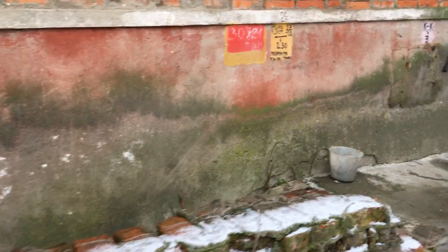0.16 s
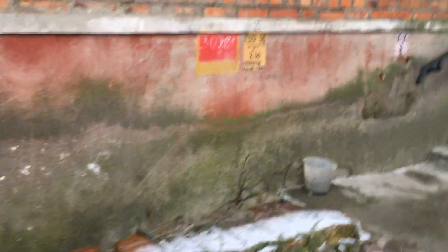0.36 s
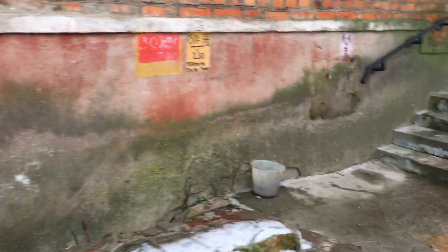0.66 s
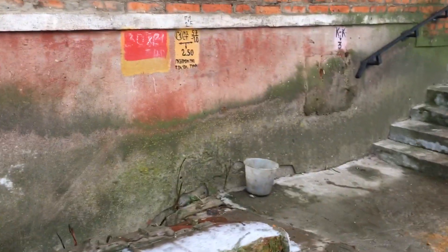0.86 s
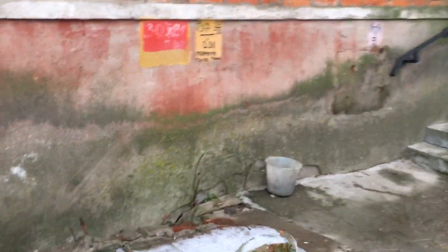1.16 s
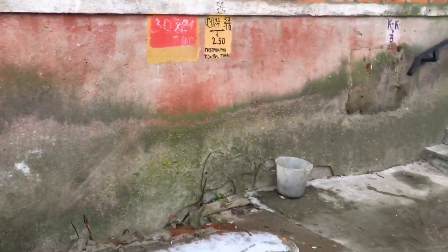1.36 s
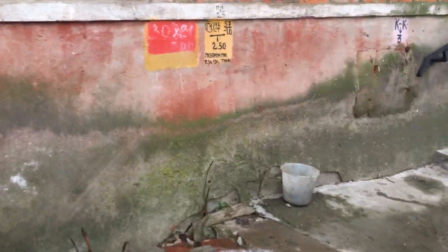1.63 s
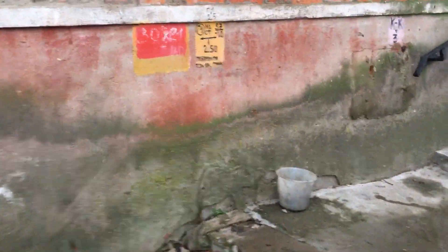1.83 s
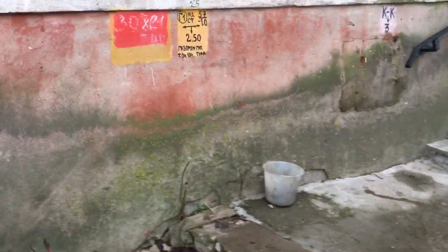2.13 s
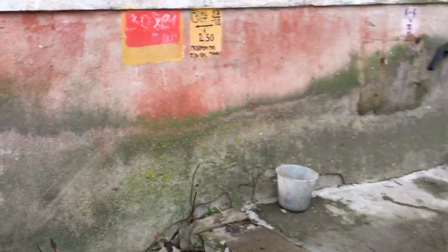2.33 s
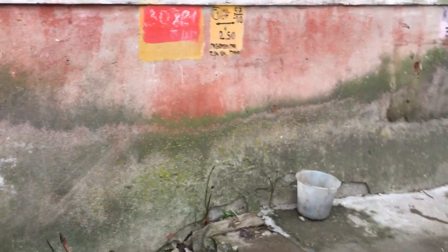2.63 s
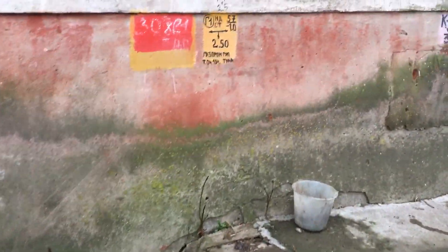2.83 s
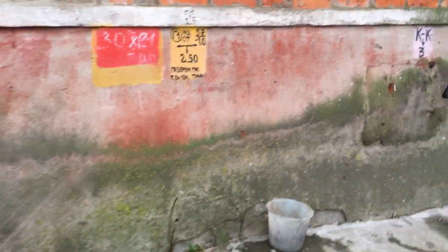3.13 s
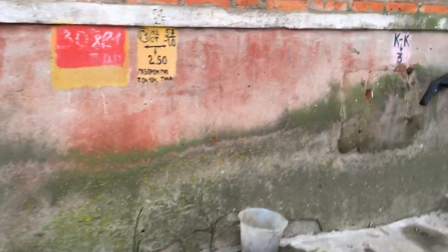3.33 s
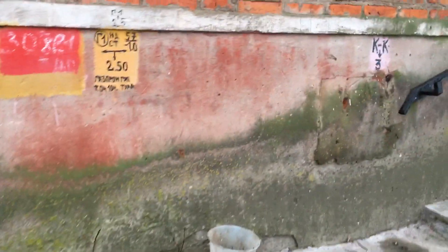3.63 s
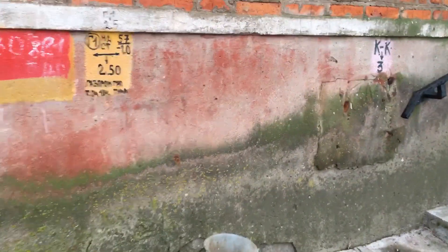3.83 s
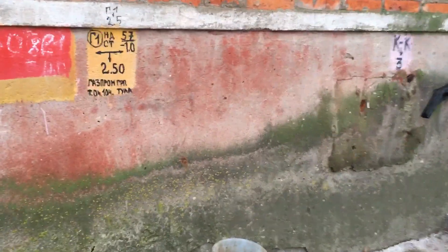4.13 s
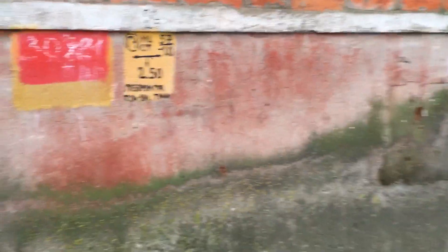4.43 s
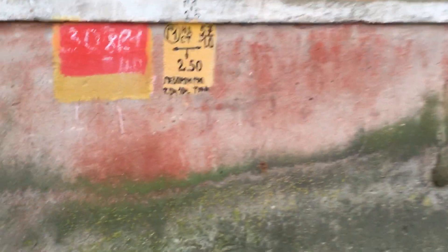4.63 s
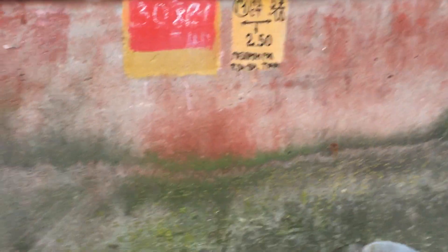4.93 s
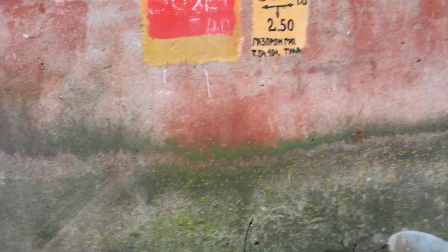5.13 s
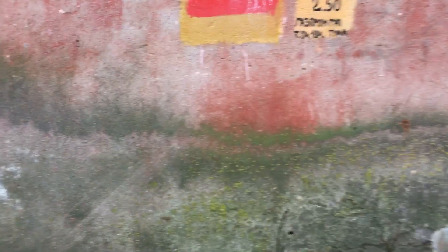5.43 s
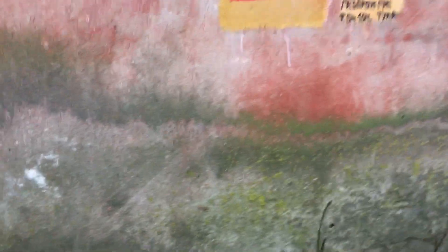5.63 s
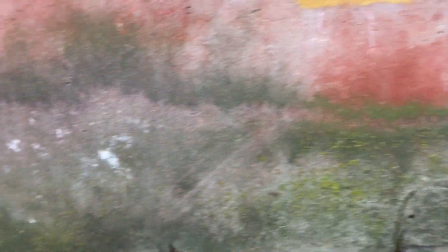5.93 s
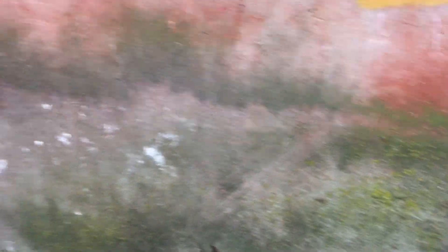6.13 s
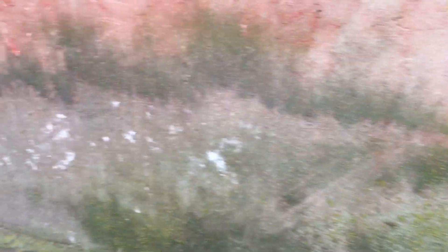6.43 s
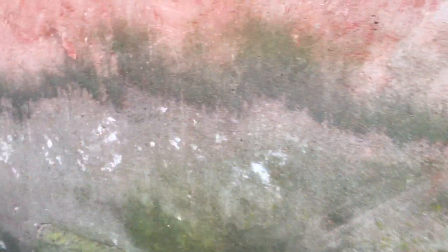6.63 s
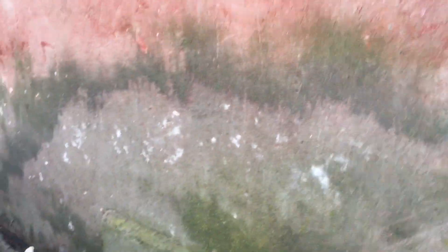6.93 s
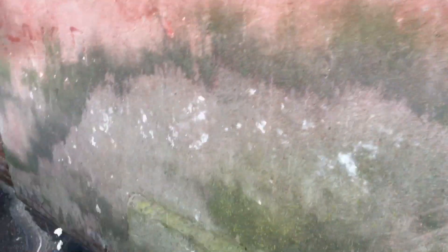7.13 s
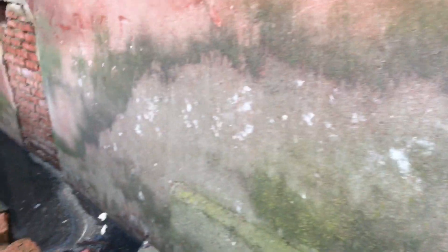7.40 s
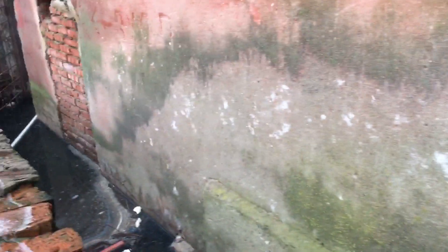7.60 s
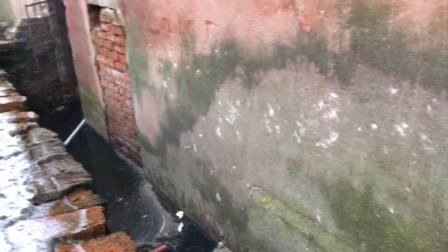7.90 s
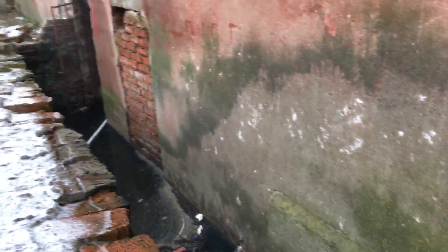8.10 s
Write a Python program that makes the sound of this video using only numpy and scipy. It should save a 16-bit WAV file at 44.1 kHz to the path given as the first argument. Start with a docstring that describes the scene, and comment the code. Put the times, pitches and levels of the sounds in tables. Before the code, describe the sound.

Boots crunch and snap crusted snow in a walled yard, two spells of steps with lulls between, over a faint low hum.

```python
"""Boots shift and step on crusted snow in a walled yard, below a hand-held camera.
The crust cracks in short pitched snaps with a splinter of hiss, or pops dully; grains crush in clumps
of clicks, packed snow thuds in a few low cycles, and ticks and soft brushes are shaped noise.
The walls throw the foot sounds back over noise, a low town hum and gusts of rumble."""
import sys
import numpy as np
from scipy import signal
from scipy.io import wavfile

SR = 44100
rng = np.random.default_rng(int(sys.argv[2]) if len(sys.argv) > 2 else 0)


def digitize_waveform(pressure):
    """Quantize a signal to 16-bit integers and store it at the path in sys.argv[1].

    Rows of a 2-D input are taken as channels; values are limited to [-1, 1].
    """
    field = np.atleast_2d(pressure).T
    bounded = np.clip(field, -1, 1)
    quanta = np.round(bounded * 32767).astype(np.int16)
    wavfile.write(sys.argv[1], SR, quanta)


def voltage_ratio(decibels):
    """Convert decibels (scalar or array-like) to amplitude ratios, 20 dB per decade."""
    exponent = np.asarray(decibels, float) / 20
    return 10 ** exponent


N = 364266

# Spectrum of breaking snow grains. Each row: frequency in Hz, relative density in dB per Hz.
GRAIN_SPECTRUM = [(600, -10.5), (1800, 4.5), (2800, -1.5), (4500, -4.5), (8000, -8.5), (13000, -6.5),
                  (15800, -12.5), (16500, -64)]


def evened(x):
    """Scales x to unit rms."""
    return x / np.sqrt(np.mean(x ** 2) + 1e-20)


def coloured(x, points):
    """Shapes x to a spectrum with causal (minimum) phase, at unit rms."""
    hz, db = np.transpose(points)
    bin_hz = abs(np.fft.fftfreq(4096, 1 / SR))
    log_gain = np.log(voltage_ratio(np.interp(np.log(bin_hz + 1), np.log(hz + 1), db)))
    taps = np.fft.ifft(np.exp(np.conj(signal.hilbert(log_gain)))).real[:2048]
    return evened(signal.oaconvolve(x, taps)[:N])


def resonate(x, hz, width_hz):
    """Resonance at unit rms: shifts hz down to zero, smooths twice, shifts back."""
    carrier = np.exp(2j * np.pi * hz * np.arange(len(x)) / SR)
    pole = np.exp(-np.pi * width_hz / SR)
    smooth = signal.lfilter([1 - pole], [1, -pole], x / carrier)
    smooth = signal.lfilter([1 - pole], [1, -pole], smooth)
    return evened((carrier * smooth).real)


def clicks(per_s, spread_db):
    """Sparse clicks of either sign; a few are large."""
    size_db = spread_db * np.minimum(rng.exponential(1, N), 3.5)
    size = voltage_ratio(size_db) * rng.choice([-1., 1.], N)
    return size * (rng.random(N) < per_s / SR)


def wavelet(t, hz, cycles):
    """A short oscillation that swells quickly and dies, envelope peak 1."""
    u = np.maximum(t, 0) * hz / cycles
    return (np.e * u / 2) ** 2 * np.exp(-u) * np.sin(2 * np.pi * hz * t)


def swells(rows):
    """Sum of bell-shaped swells from rows of time, half length and dB."""
    t = np.arange(N) / SR
    return sum(voltage_ratio(db) * np.exp(-((t - s) / half_s) ** 2) for s, half_s, db in rows)


def yard():
    """Smooth far noise, fuzzy drones and a swelling rumble, all ebbing slowly apart from the gusts."""
    # Far noise. Each row: frequency in Hz, relative density in dB per Hz.
    air_spectrum = [(20, -21.5), (58, -8), (101, -15.5), (134, -10.5), (222, -17.5), (540, -26.5),
                    (1500, -34.5), (4000, -41.5), (9000, -46), (15500, -50), (16400, -66)]
    # Far drones. Each row: frequency in Hz, pole width in Hz, rms level at mid-scene in dB.
    hum = [(61.4, 7.7, -65), (153, 12.4, -67), (257, 58, -70)]
    # Rumble swells. Each row: centre in seconds, half length in seconds, rms level in dB.
    gusts = [(1.27, 0.14, -63), (5.67, 0.04, -44), (5.99, 0.071, -46.5)]
    air_db, air_fade_db_per_s, hum_fade_db_per_s = -59.5, -0.39, -0.7  # air_db at mid-scene
    rumble_start_db, rumble_fade_db_per_s = -58.5, -0.97
    t = np.arange(N) / SR
    from_middle_s = t - t.mean()
    air = coloured(rng.standard_normal(N), air_spectrum)
    air = air * voltage_ratio(air_db + air_fade_db_per_s * from_middle_s)
    drones = sum(voltage_ratio(db) * resonate(rng.standard_normal(N), hz, width_hz) for hz, width_hz, db in hum)
    drones = drones * voltage_ratio(hum_fade_db_per_s * from_middle_s)
    rumble_level = voltage_ratio(rumble_start_db + rumble_fade_db_per_s * t) + swells(gusts)
    rumble = rumble_level * resonate(rng.standard_normal(N), 62.3, 42)
    return air + drones + rumble


def walls(x, tail_db=-16, t60_s=0.19, smear_s=0.0012):
    """A few echoes from near rough brick, each smeared, and a short diffuse tail, all dulled."""
    # Wall echoes. Each row: delay in seconds, level in dB.
    echoes = [(.0056, -13.5), (0.013, -18), (0.0222, -19), (.03, -19)]
    t = np.arange(SR // 4) / SR
    tail = rng.standard_normal(len(t)) * (t > .004) * voltage_ratio(-60 * t / t60_s)
    taps = voltage_ratio(tail_db) * tail / np.linalg.norm(tail)
    for s, db in echoes:
        echo = rng.standard_normal(len(t)) * np.exp(-((t - s) / smear_s) ** 2)
        taps += voltage_ratio(db) * echo / np.linalg.norm(echo)
    dull = signal.butter(1, 3000, fs=SR, output="sos")
    return signal.fftconvolve(signal.sosfilt(dull, x), taps)[:N]


def tipped(start_s=4.2, length_s=0.1):
    """How far (0-1) the camera has tipped down towards the feet, where it hears more treble."""
    return np.clip((np.arange(N) / SR - start_s) / length_s, 0, 1)


def brushes():
    """Something soft brushes past: dense even clicks, band-passed, swell and fade."""
    # Brushes. Each row: centre in seconds, half length in seconds, rms level in dB.
    brush_rows = [(0.026, 0.049, -63.5), (1.454, 0.062, -59)]
    band = signal.butter(2, [500, 3200], "band", fs=SR, output="sos")
    return swells(brush_rows) * evened(signal.sosfilt(band, clicks(9000, 0.66)))


def ticks(fade_s=0.001, low_hz=5000):
    """Ice needles tick: each a very short burst of high hiss."""
    # Ticks. Each row: start in seconds, relative level in dB.
    tick_rows = [(1.008, -53), (1.027, -48.5), (1.184, -60), (1.258, -42.5), (4.779, -29), (4.898, -43.5),
                 (5.027, -39), (5.135, -41), (5.223, -34.5), (5.448, -32), (5.468, -43), (5.561, -50),
                 (5.651, -43), (5.713, -34), (6.038, -34), (6.977, -38), (7.419, -33.5)]
    train = np.zeros(N)
    for s, db in tick_rows:
        train[round(s * SR)] = voltage_ratio(db)
    bursts = signal.oaconvolve(train, np.exp(-np.arange(512) / SR / fade_s))[:N]
    band = signal.butter(2, [low_hz, 15500], "band", fs=SR, output="sos")
    hiss = signal.sosfilt(band, rng.standard_normal(N))
    return 0.57 * bursts * evened(hiss)


def thuds():
    """Packed snow caves in: each thud is a low, heavily damped oscillation."""
    # Cave-ins. Each row: start in seconds, envelope peak in dB.
    thud_rows = [(0.286, -44.5), (4.161, -29), (4.172, -30), (4.185, -42), (4.197, -27.5), (4.351, -31.5),
                 (4.388, -40.5), (4.583, -34.5), (4.63, -30.5), (4.774, -35), (5.204, -35.5), (5.259, -34),
                 (5.28, -36.5), (5.407, -32), (6.281, -35.5), (6.404, -26.5), (6.543, -14), (6.574, -26),
                 (6.614, -25), (6.639, -27), (6.655, -24), (6.711, -25), (6.755, -22)]
    out = np.zeros(N)
    thud = wavelet(np.arange(2048) / SR, 289.4, 0.47)
    for s, db in thud_rows:
        out[round(s * SR):][:2048] += voltage_ratio(db) * thud
    return out


def load(rise_s=0.0014, settle_s=0.013, creep_db=-16, creep_s=0.17):
    """Levels of fine grains, lumps and packing: a crunch starts fast, holds, settles, creeps on faintly."""
    # Weight on the snow. Each row: start in seconds, hold in seconds, weight in dB, sole depth 0-1.
    crunches = [(0.208, 0.11, -65, 0.86), (0.81, 0.51, -67, 0.33), (1.616, 0.32, -72, 0.86),
                (2.092, 0.049, -62.5, 0.05), (2.229, 0.2, -63.5, 0.5), (2.538, 0.083, -55.5, 0),
                (2.637, 0.21, -69.5, 0.66), (3.189, 0.0038, -50, 0.93), (3.215, 0.018, -40.5, 0.72),
                (3.359, 0.08, -52, 0.72), (3.493, 0.056, -55, 0.5), (3.587, 0.18, -60.5, 0.28),
                (3.916, 0.079, -63.5, 0.36), (4.073, 0.067, -52.5, 0.4), (4.152, 0.068, -45, 0.68),
                (4.229, 0.041, -52, 0.75), (4.346, 0.043, -55.5, 0.74), (4.45, 0.27, -58.5, 0.57),
                (4.709, 0.094, -44.5, 0.69), (4.924, 0.023, -58.5, 0), (5.029, 0.074, -53, 0.87),
                (5.128, 0.051, -66, 0.8), (5.202, 0.031, -50.5, 0.82), (5.269, 0.022, -53.5, 0.84),
                (5.404, 0.12, -52, 0.74), (5.545, 0.067, -51.5, 0.63), (5.634, 0.11, -57.5, 0.7),
                (6.037, 0.039, -50, 0.62), (6.117, 0.07, -61.5, 0.1), (6.276, 0.18, -47.5, 0.59),
                (6.393, 0.051, -45, 0.84), (6.466, 0.11, -46.5, 0.82), (6.57, 0.22, -46.5, 0.97),
                (6.787, 0.024, -48.5, 0.78), (6.828, 0.15, -61, 0.64), (6.946, 0.23, -64.5, 0),
                (7.202, 0.27, -72, 0.6)]
    # Level re weight at depth 0. Columns: fine grains, lumps, packing, all in dB.
    shallow_db = [-0.5, -11, -20]
    # Level re weight at depth 1. Columns: fine grains, lumps, packing, all in dB.
    deep_db = [0, 7.5, 10]
    t = np.arange(N) / SR
    power = np.zeros((3, N))
    for s, hold_s, weight_db, depth in crunches:
        levels = voltage_ratio(weight_db + (1 - depth) * np.array(shallow_db) + depth * np.array(deep_db))
        rise = np.clip((t - s) / rise_s, 0, 1)
        past_s = np.maximum(t - s - hold_s, 0)
        fall = np.maximum(np.exp(-past_s / settle_s), voltage_ratio(creep_db) * np.exp(-past_s / creep_s))
        power += (levels[:, None] * rise * fall) ** 2
    return np.sqrt(power)


def pieces(clumps, sizes_hz, per_s):
    """Short pitched breaks, one sparse train for each size of piece."""
    t = np.arange(1024) / SR
    trains = (signal.oaconvolve(clumps * clicks(per_s, 3.84), wavelet(t, hz, 0.63))[:N] for hz in sizes_hz)
    return evened(sum(trains))


def crush(heavy_db=-54, light_dullness_when_tipped=0.047):
    """Snow breaks in clumps that fire fine grains, chips, lumps and dull slips of the hollow underfoot."""
    # Hollow under the sole. Each row: frequency in Hz, pole width in Hz, relative level in dB.
    packed = [(162.3, 81, 4), (289.3, 87, 2.5)]
    levels = load()
    heavy = np.clip(levels[0] / voltage_ratio(heavy_db), 0, 1)

    clump = np.exp(-np.arange(1500) / SR / 0.0028)
    bursts = evened(signal.oaconvolve(abs(clicks(80, 2.1)), clump)[:N])
    steady = 0.21 + 0.92 * heavy  # heavy load runs the clumps together
    clumps = (steady + np.minimum(bursts, 2.6)) / (1 + steady)

    grains = coloured(clumps * clicks(6000, 2.86), GRAIN_SPECTRUM)
    top = signal.sosfilt(signal.butter(1, 7000, "high", fs=SR, output="sos"), grains)
    dullness = (1 - (1 - light_dullness_when_tipped) * tipped()) * (1 - heavy)
    grains = grains - np.minimum(3.7 * dullness, 1) * top  # a light load is duller
    fine = grains + .6 * pieces(clumps, np.geomspace(2200, 7000, 8), 70)  # grains and chips

    lumps = pieces(clumps, np.geomspace(430, 2200, 12), 110)
    slips = (1 + 0.18 * clumps) * clicks(180, 3.2)
    hollow = sum(voltage_ratio(db) * resonate(slips, hz, width_hz) for hz, width_hz, db in packed)
    return (levels * [evened(fine), lumps, evened(hollow)]).sum(0)


def cracks(crumble_db=-12, crumble_s=0.005):
    """A crack is a slab snap, a splinter of hiss and three smaller late breaks; a pop breaks once."""
    # Cracks of the crust. Each row: start in seconds, snap envelope peak in dB, slab pitch in Hz.
    crack_rows = [(0.229, -39, 1220), (1.245, -55, 3550), (1.84, -50, 2000), (1.859, -40.5, 1790),
                  (2.095, -48.5, 3220), (2.326, -49, 3740), (2.366, -42.5, 2430), (2.672, -35, 2140),
                  (3.194, -27.5, 1130), (3.215, -26, 610), (3.263, -31.5, 760), (3.346, -36, 686),
                  (3.366, -34, 1100), (3.398, -22, 700), (3.421, -27.5, 1280), (3.482, -33, 1510),
                  (3.512, -23, 780), (3.541, -30.5, 1060), (3.628, -36, 1020), (3.678, -36.5, 1120),
                  (4.078, -34, 2330), (4.12, -32, 830), (4.186, -24, 2380), (4.2, -26, 920),
                  (4.233, -37, 990), (4.256, -33, 1540), (4.375, -38.5, 1380), (4.44, -41, 1620),
                  (4.467, -38, 910), (4.48, -33.5, 1240), (4.497, -30.5, 1780), (4.539, -33.5, 644),
                  (4.584, -28.5, 980), (4.629, -31.5, 900), (4.666, -23.5, 3330), (4.712, -24.5, 800),
                  (4.941, -37, 2330), (5.037, -35, 1030), (5.058, -37, 1800), (5.186, -42, 1180),
                  (5.202, -32, 1140), (5.28, -41.5, 504), (5.369, -49, 1100), (5.393, -33.5, 1110),
                  (5.41, -24, 820), (5.43, -27, 1160), (5.491, -25.5, 1010), (5.557, -31, 1300),
                  (5.58, -28.5, 1810), (5.597, -28.5, 1090), (5.642, -36.5, 1730), (5.802, -43, 2100),
                  (5.954, -39.5, 1720), (6.055, -31, 1540), (6.122, -43.5, 1220), (6.294, -25, 1200),
                  (6.405, -21.5, 940), (6.574, -21.5, 870), (6.612, -29, 2370), (6.636, -26.5, 2340),
                  (6.695, -34, 1320), (6.727, -24.5, 603), (6.76, -23, 675), (6.936, -43, 1500),
                  (7.059, -45.5, 2300), (7.121, -48.5, 1670), (7.238, -54.5, 1790), (7.419, -33, 2700)]
    # Dull pops of a hollow ice shell. Each row: start in seconds, snap envelope peak in dB, pitch in Hz.
    pop_rows = [(0.521, -25.5, 1430), (0.552, -33.5, 1320), (0.602, -47.5, 3530), (0.667, -44, 3300),
                (0.716, -22.5, 1330), (0.844, -41, 4300), (0.854, -22.5, 1710), (0.934, -30.5, 1770),
                (1.819, -34, 1100)]
    crack_cycles, pop_cycles = .48, .56  # decay of the snap
    level_camera_db = -3  # splinters until the camera tips
    # splinter in dB re snap peak; a louder crack has relatively less
    rows = [(*row, -21.5 - 0.5 * row[1], crack_cycles, 1) for row in crack_rows]
    rows += [(*row, -16, pop_cycles, 0) for row in pop_rows]

    dull = signal.butter(1, 8000, fs=SR, output="sos")
    hiss = signal.sosfilt(dull, coloured(rng.standard_normal(N), GRAIN_SPECTRUM))
    hiss = hiss * voltage_ratio(level_camera_db * (1 - tipped()))
    out = np.zeros(N + 4096)
    t = np.arange(4096) / SR
    chance = rng.random((len(rows), 3, 3))
    for (s, db, hz, splinter_db, cycles, crumbles), after in zip(rows, chance):
        snap = -wavelet(t, hz, cycles)
        burst = np.exp(-t / 0.0016)
        for wait, detune, size in after:
            late_s = t + crumble_s * np.log(1 - wait)  # exponential waiting time
            gain = crumbles * voltage_ratio(crumble_db - 2.2 * size)
            snap += gain * wavelet(late_s, hz * (.8 + .7 * detune), .7)
            burst += 0.99 * gain * (late_s > 0) * np.exp(-abs(late_s) / 0.0011)
        at = round(s * SR)
        splinter = voltage_ratio(splinter_db) * burst * hiss[at:at + 4096]
        out[at:at + 4096] += voltage_ratio(db) * (snap + splinter)
    return out[:N]


def scene():
    """Foot sounds, their wall echoes and the yard, in one channel."""
    feet = cracks() + ticks() + thuds() + crush() + brushes()
    return (feet + walls(feet) + yard())[None]


def low_pass(x):
    """Removes everything above the highest recorded frequency."""
    return signal.sosfilt(signal.butter(12, 16810, fs=SR, output="sos"), x)


def record(dry):
    """The camera body dents the treble at two places."""
    # Dents. Each row: centre in Hz, width in Hz, gain at centre in dB.
    dents = [(4870, 380, -4), (10450, 380, -7)]
    for hz, width_hz, db in dents:
        band = signal.lfilter(*signal.iirpeak(hz, hz / width_hz, SR), dry)
        dry = dry - (1 - voltage_ratio(db)) * band
    return low_pass(dry)


dry = scene()
out = record(dry)
digitize_waveform(out)
```